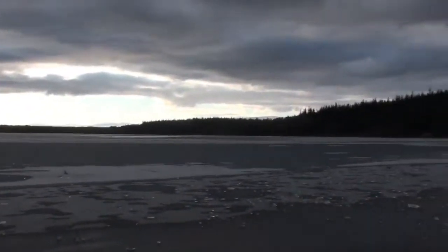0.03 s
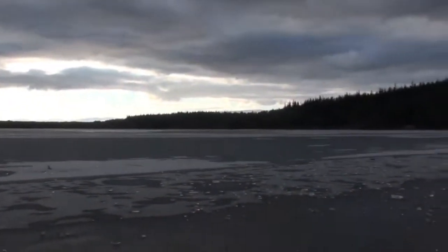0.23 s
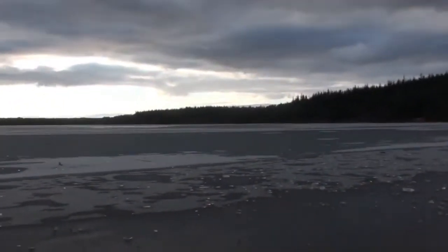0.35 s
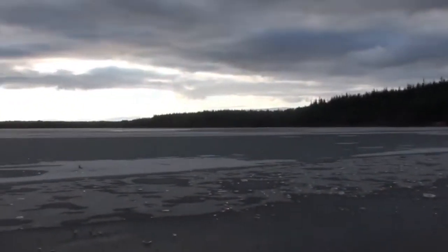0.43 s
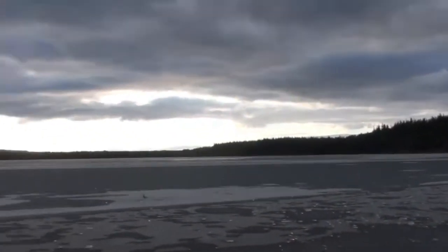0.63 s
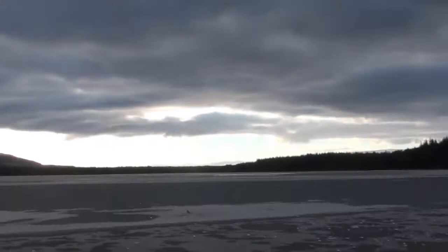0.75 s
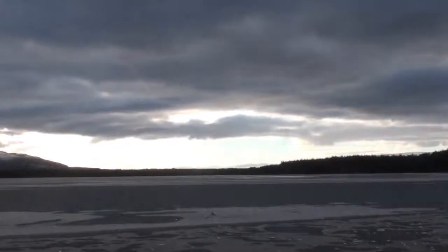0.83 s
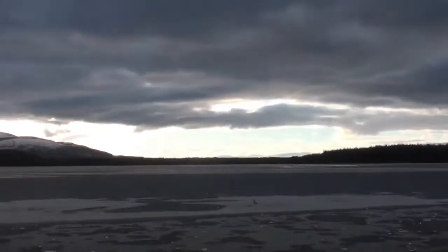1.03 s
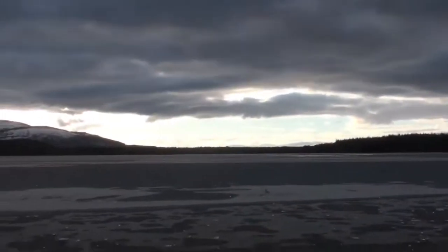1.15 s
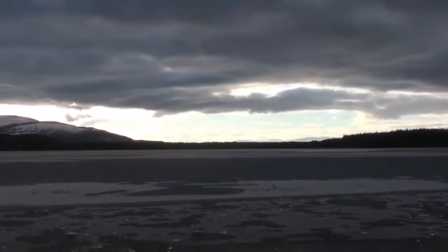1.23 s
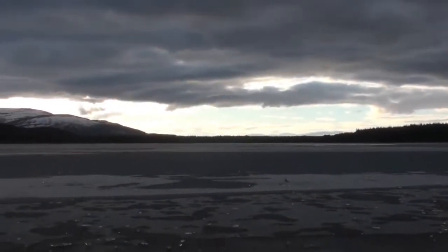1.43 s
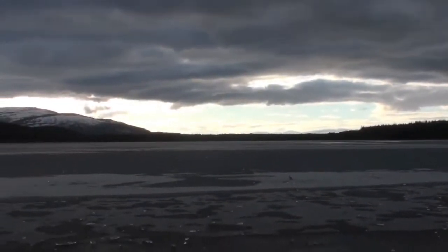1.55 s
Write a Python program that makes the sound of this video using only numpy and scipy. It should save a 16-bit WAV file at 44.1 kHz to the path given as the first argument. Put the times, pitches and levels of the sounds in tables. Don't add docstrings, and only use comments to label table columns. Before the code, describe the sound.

Sharp, brittle crack of thin lake ice at left, followed by glassy shards bouncing, ticking and sliding.

```python
import sys
import numpy as np
from scipy import signal
from scipy.fft import rfft, irfft
from scipy.io import wavfile

SR = 44100
rng = np.random.default_rng(int(sys.argv[2]) if len(sys.argv) > 2 else 0)


def unload_audio(sound):
    columns = np.transpose(np.atleast_2d(sound))
    steps = np.round(np.clip(columns, -1, 1) * 32767)
    wavfile.write(sys.argv[1], SR, steps.astype(np.int16))


def gain_from_db(level_db):
    decades = np.asarray(level_db, float) / 20
    return 10 ** decades


N = 70560
T = np.arange(N) / SR
BIN_HZ = np.maximum(np.arange(N // 2 + 1) * SR / N, 5)
LEFT_RIGHT = np.array([[1], [-1]])

# (pitch_hz, level_db)
HUSH_SPECTRUM = [(88, -45), (150, -15.5), (534, -10.5), (649, -9), (871, -3), (960, -6), (1040, -4),
                 (2870, -24.5), (16000, -32.5)]
# (pitch_hz, lean_db)
HUSH_LEAN = [(60, 14), (150, -5.5), (380, -2.5), (950, -8), (2380, -7.5), (5980, 4), (15000, -3)]
# (pitch_hz, likeness_0_to_1)
HUSH_LIKENESS = [(60, 1), (240, 0.65), (950, 0.74), (3770, 0.043), (15000, 1)]
# (time_s, level_db)
GUST = [
    (0, -50),
    (.2, -50),
    (.38, -55),
    (.55, -40.5),
    (.68, -40.5),
    (.78, -44),
    (1., -41.5),
    (1.3, -32.5),
    (1.37, -41.5),
    (1.6, -48.5),
]
# (pitch_hz, level_db_per_hz)
WIND_SPECTRUM = [(12, -41), (20, 10), (87, 2.5), (129, -3.5), (225, -10), (400, -28), (520, -53),
                 (880, -120)]
# (pitch_hz, likeness_0_to_1)
WIND_LIKENESS = [(30, 0.86), (300, 0.63)]
# (centre_s, level_db, pitch_hz, length_turns)
EDDIES = [(0.586, -24, 87, 0.9), (0.547, -36, 61.6, 0.6), (0.634, -32.5, 115, 2.4), (0.723, -29, 68, 0.93),
          (0.828, -37, 66.5, 2.3), (0.930, -28.5, 85, 1.1), (.963, -34, 67, 1.2), (1.0044, -25, 89.5, 1),
          (1.052, -29, 105, 1.55), (1.149, -26.5, 80, 2.1), (1.206, -24, 74.6, 1.3), (1.236, -31, 87, 3.3),
          (1.257, -23, 84, 0.59), (1.293, -30.5, 89, 4), (1.315, -42, 86, 0.74), (1.401, -33.5, 375, 1.2),
          (1.413, -34, 228, 1)]
# (time_s, hiss_db, rattle_over_hiss_db)
SLIDE = [
    (.24, -52, 15),
    (.33, -59.5, 8),
    (.6, -57, 9),
    (.87, -59, 11.5),
    (1.15, -56.5, 4),
    (1.32, -50, -2.5),
    (1.47, -50.5, -3.5),
    (1.6, -59.5, -9),
]
# (pitch_hz, level_db_per_hz)
SLIDE_SPECTRUM = [(180, -11.5), (300, -3.5), (343, -5), (656, -7.5), (774, -8), (2930, -12.5), (8640, -21),
                  (12500, -18), (16200, -26.5)]
# (pitch_hz, level_db)
SHARD_MODES = [(1450, -6), (2960, -7), (4060, -3), (6210, 0), (6880, -2.5), (7500, -2.5), (9300, -5)]
# (start_s, level_db, pitch_hz)
PINGS = [(.296, -27, 6480), (0.355, -24, 11600), (.364, -26, 12040), (0.367, -43.5, 4100),
         (.368, -22, 14500), (.400, -42, 6900), (.403, -38, 9200), (.403, -36, 11900), (0.416, -43, 6750),
         (.4246, -36, 11900), (0.439, -39, 8800), (0.441, -30, 2942), (0.444, -40, 6160), (0.44, -45, 4200),
         (0.447, -42, 3990), (.468, -41, 4040), (0.467, -42, 2905), (0.481, -32, 2973), (0.485, -41, 4010),
         (0.479, -35.5, 7000), (.4925, -27, 13700), (.511, -31, 7300), (.5485, -30, 15100),
         (0.582, -37.5, 6700), (0.596, -27.5, 11830), (0.652, -31.5, 6330), (0.719, -28.5, 9310),
         (.899, -28, 12500), (.934, -41, 15300), (.969, -34, 12200), (.969, -40, 6000), (1.002, -39, 6600),
         (1.010, -40, 12200), (1.119, -28, 12600), (1.206, -45, 6500), (.700, -34, 14800),
         (0.701, -39.5, 2980), (.694, -43, 3800), (0.722, -32, 3860), (.832, -39.5, 3920),
         (0.85, -36, 2960), (.734, -26, 11900), (.753, -21.5, 12700), (0.838, -27, 15000),
         (0.845, -34, 4000), (1.025, -39, 2910), (1.0542, -39.5, 2920), (1.063, -34.5, 6700),
         (1.227, -39.5, 2940), (1.432, -40.5, 2940)]
# (start_s, level_db, t60_s, treble_over_body_db)
CRACKS = [(0.2395, -25, 0.032, 9), (0.2427, -21, 0.024, 9.5), (0.261, -30, 0.015, 9.5),
          (.2640, -24.5, 0.016, 5), (0.2706, -20.5, 0.0076, 5), (0.2723, -33, 0.031, 14),
          (0.276, -25, 0.013, 5), (0.279, -39, 0.18, 6), (0.289, -40, 0.0051, 12), (0.38, -55, .006, 26),
          (.4250, -62, .006, 20), (0.3686, -51.5, 0.013, 27.5), (0.4364, -38, 0.058, 5.5),
          (0.4927, -35.5, 0.019, 8), (0.526, -42, 0.0069, 21), (0.548, -42.5, 0.014, 15),
          (0.556, -49, 0.0073, 21), (.590, -54, 0.0096, 26), (.6040, -45, 0.004, 24),
          (0.6125, -50, 0.0055, 26), (0.654, -37.5, 0.0091, 7), (0.699, -50, 0.13, 16.5),
          (0.749, -40, 0.039, 6), (0.7537, -42.5, 0.01, 15.5), (.815, -34, 0.016, 1),
          (0.832, -39, 0.037, -2), (0.845, -40, 0.035, -4), (0.852, -39.5, 0.037, 10),
          (0.863, -38, 0.016, -9), (0.778, -43, .006, 13), (0.803, -51, 0.0075, 20),
          (.969, -56, 0.0085, 12), (1.0555, -39.5, 0.017, 12), (1.154, -35.5, 0.0039, -8)]
# (pitch_hz, level_db_per_hz)
CRACK_BODY = [(500, -29), (1000, -0.5), (1700, 0), (2600, -3), (4300, -1.5), (6500, -14), (10000, -18)]
# (pitch_hz, level_db_per_hz)
CRACK_TREBLE = [(3000, -37), (5500, 1), (9000, 1.5), (12500, 3), (16200, -2)]
# (pitch_hz, level_db_per_hz)
THUD_SPECTRUM = [(120, -34), (230, 4), (750, 14.5), (1400, -31)]
# (start_s, level_db, pitch_hz, t60_cycles)
SNAPS = [(0.2426, -12.5, 4340, 4), (0.2426, -13, 2600, 4.8), (.2446, -14, 1140, 2.3),
         (0.2602, -8.5, 1680, 7.9), (0.2615, -11.5, 3970, 10), (.2612, -45, 338, 2.4),
         (0.2708, -9, 1220, 5.4), (0.271, -33, 6000, 8), (.2738, -22, 5560, 6.8), (0.279, -20, 4250, 10),
         (0.4351, -23, 1800, 4.4), (0.5264, -22, 6150, 8.4), (.6040, -16.5, 4160, 3.9),
         (0.6533, -19.5, 1860, 6), (0.8498, -20.5, 6940, 23), (0.9406, -25, 6000, 5),
         (1.0563, -24, 4580, 16), (1.0562, -29, 700, 2.5), (1.0572, -22, 6640, 14)]
# (end_s, level_db, length_s, last_pitch_hz)
WHISTLES = [(0.2386, -24, 0.012, 1563), (.2475, -20, .007, 1204), (0.2541, -26, .007, 1350),
            (0.2599, -18.5, 0.0087, 1552), (.2665, -43, 0.0094, 1640), (0.27, -20.5, .008, 1430),
            (0.277, -21.5, 0.0062, 1485), (0.289, -37, .009, 1410), (0.408, -46, 0.022, 1545),
            (.436, -34, 0.005, 1600), (0.491, -39, 0.027, 1500), (0.546, -41.5, 0.014, 1540),
            (0.638, -46, 0.014, 1770), (0.6512, -40.5, 0.012, 1448), (0.751, -38, 0.028, 1398)]
# (pitch_hz, lean_db)
ICE_LEAN = [(60, 0.5), (130, 1.0), (290, 3.0), (640, 10.0), (1410, 14.5), (3100, 11.5), (6820, 2.0),
            (15000, -2.5)]
# (pitch_hz, phase_rad)
ICE_PHASE = [(0, 0), (4650, -1.18), (7580, -1.57), (9910, -1.72), (11100, 1.25), (16400, -1.1)]


def at_bins(points):
    hz, value = np.array(points).T
    return np.interp(np.log(BIN_HZ), np.log(hz), value)


def rms_one(x):
    return x / np.sqrt(np.mean(x ** 2) + 1e-20)


def coloured(x, spectrum):
    return irfft(rfft(x) * rms_one(gain_from_db(at_bins(spectrum))), N)


def drift(rate_hz):
    lowpass = 1 / (1 + (np.arange(len(BIN_HZ)) * SR / N / rate_hz) ** 2)
    return rms_one(irfft(rfft(rng.standard_normal(N)) * lowpass, N))


def ring(clicks, hz, t60_s):
    radius = gain_from_db(-60 / (t60_s * SR))
    turn = 2 * np.pi * hz / SR
    return signal.lfilter([0, np.sin(turn)], [1, -2 * radius * np.cos(turn), radius ** 2], clicks + 1e-18)


def wide_noise(spectrum, likeness, lean_db):
    mid, side = rfft(rng.standard_normal((2, N))) * gain_from_db(at_bins(spectrum))
    alike = np.clip(at_bins(likeness), 0, 1)
    ports = np.sqrt(1 + alike) * mid + np.sqrt(1 - alike) * side * LEFT_RIGHT
    return rms_one(irfft(ports * gain_from_db(LEFT_RIGHT * at_bins(lean_db) / 2), N))


def shore_hush():
    level = gain_from_db(-49.5 + 0.5 * drift(27))
    return level * wide_noise([(60, -23)] + HUSH_SPECTRUM, HUSH_LIKENESS, HUSH_LEAN)


def wind():
    time_s, gust_db = np.transpose(GUST)
    level = gain_from_db(np.interp(T, time_s, gust_db) + 1.5 * drift(5.2))
    out = level * wide_noise(WIND_SPECTRUM + [(900, -74)], WIND_LIKENESS, [(20, 0), (400, 0)])
    lag_rad, side_db = 0.6, -7
    for centre_s, db, hz, turns in EDDIES:
        t = T - centre_s
        bell = gain_from_db(db) * np.exp(-(2 * t * hz / turns) ** 2)
        phase = 2 * np.pi * hz * t - lag_rad
        out += bell * (-np.cos(phase) + gain_from_db(side_db) * np.sin(phase) * LEFT_RIGHT)
    return out


def shard_rattle():
    knocks_per_s, t60_cycles = 1300, 75
    out = np.zeros(N)
    for hz, db in SHARD_MODES:
        struck = rng.random(N) < knocks_per_s / SR * gain_from_db(4 * drift(25)) / 4
        size = gain_from_db(db + 4 * rng.standard_normal(N)) * rng.choice([-1, 1], N)
        out += ring(struck * size, hz, t60_cycles / hz)
    return rms_one(out)


def dry_ticks():
    ticks_per_s = 140
    caught = rng.random(N) < ticks_per_s / SR * gain_from_db(4 * drift(10))
    clicks = caught * gain_from_db(6.1 * rng.standard_normal(N))
    burst = rng.standard_normal(90) * gain_from_db(-0.4 * np.arange(90))
    return rms_one(coloured(np.convolve(clicks, burst)[:N], CRACK_TREBLE))


def slide():
    landing_s, rattle_gain_db, tick_db = 0.239, -2, -15
    time_s, hiss_db, rattle_db = np.transpose(SLIDE)
    level = gain_from_db(np.interp(T, time_s, hiss_db)) * (T > landing_s)
    hiss = coloured(rng.standard_normal(N), SLIDE_SPECTRUM) * gain_from_db(4.5 + 1.2 * drift(30))
    grit = shard_rattle() + gain_from_db(tick_db) * dry_ticks()
    return level * (hiss + gain_from_db(rattle_gain_db + np.interp(T, time_s, rattle_db)) * grit)


def pings():
    rise_s, t60_cycles, wobble_db = 0.0014, 145, 4.5
    out = np.zeros(N)
    for start_s, db, hz in PINGS:
        t = np.maximum(T - start_s, 0)
        swell = 1 - np.exp(-t / rise_s)
        out += gain_from_db(db - 60 * t * hz / t60_cycles) * swell * np.sin(2 * np.pi * hz * t)
    return out * gain_from_db(wobble_db * drift(160))


def cracks():
    splinters_per_s, spread_db = 14000, 3
    snap_s = 0.011
    sizes = gain_from_db(spread_db * np.minimum(rng.exponential(1, (2, N)), 3)) * rng.choice([-1, 1], (2, N))
    swarm = sizes * (rng.random((2, N)) < splinters_per_s / SR)
    body, treble, thud = np.zeros((3, N))
    for start_s, db, t60_s, treble_db in CRACKS:
        env = (T >= start_s) * gain_from_db(-60 * np.maximum(T - start_s, 0) / t60_s)
        burst = env * swarm
        burst *= np.sqrt(np.sum(env ** 2) / np.sum(burst ** 2, axis=1, keepdims=True))
        burst[:, int(start_s * SR) + 1] += snap_s / t60_s
        body += gain_from_db(db) * burst[0]
        treble += gain_from_db(db + treble_db) * burst[1]
        thud += gain_from_db(2 * db + 17) * burst[0]
    low = coloured(body, CRACK_BODY) + coloured(thud, THUD_SPECTRUM)
    return low + gain_from_db(-7) * coloured(treble, CRACK_TREBLE)


def snaps():
    out = np.zeros(N)
    for start_s, db, hz, t60_cycles in SNAPS:
        t = np.maximum(T - start_s, 0)
        out -= gain_from_db(db - 60 * t * hz / t60_cycles) * np.sin(2 * np.pi * hz * t)
    return signal.sosfilt(signal.butter(2, 170, "high", fs=SR, output="sos"), out)


def whistles():
    drop_hz, full_s, peak_at = 1650, 0.012, 0.68
    glide_per_db = 2.3
    first_db = WHISTLES[0][1]
    skew = np.log(0.5) / np.log(peak_at)
    out = np.zeros(N)
    for end_s, db, length_s, last_hz in WHISTLES:
        t = np.arange(int(length_s * SR)) / SR
        glide = drop_hz * gain_from_db(glide_per_db * min(db - first_db, 0))
        hz = last_hz + glide * ((length_s - t) / full_s) ** 2
        shape = np.sin(np.pi * (t / length_s) ** skew) ** 2
        i = int((end_s - length_s) * SR)
        out[i:i + len(t)] += gain_from_db(db) * shape * np.sin(2 * np.pi * np.cumsum(hz) / SR)
    wobble_db = np.where(T < 0.3, -2.9, 5)
    return out * gain_from_db(wobble_db * drift(300))


def ice_to_ports(x):
    scatter_db, scatter_t60_s = -12, 0.03
    level = gain_from_db(LEFT_RIGHT * at_bins(ICE_LEAN) / 2)
    phase = np.exp(0.5j * LEFT_RIGHT * at_bins(ICE_PHASE))
    direct = irfft(rfft(x) * level * phase, N)
    size = SR // 10
    tails = np.gradient(rng.standard_normal((2, size)), axis=1) * gain_from_db(-60 * T[:size] / scatter_t60_s)
    tails /= np.sqrt(np.sum(tails ** 2, axis=1, keepdims=True))
    scattered = signal.fftconvolve(direct, tails, axes=1)[:, :N]
    return direct + gain_from_db(scatter_db) * scattered


def scene():
    hush = shore_hush()
    ice = whistles() + snaps() + cracks() + pings() + slide()
    return ice_to_ports(ice) + hush + wind()


def roll_off(x):
    return signal.sosfilt(signal.butter(12, 16800, fs=SR, output="sos"), x)


def record(dry):
    overload = 0.95
    rounded = overload * np.tanh(dry / overload)
    x = signal.sosfilt(signal.butter(2, 32, "high", fs=SR, output="sos"), rounded)
    x = signal.sosfilt(signal.ellip(8, 0.5, 36, 16020, fs=SR, output="sos"), x)
    return roll_off(x)


dry = scene()
out = record(dry)
unload_audio(out)
```